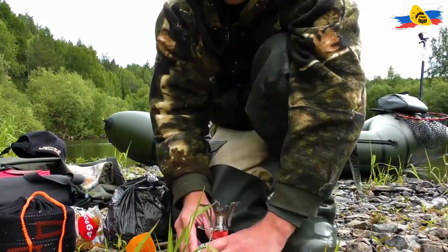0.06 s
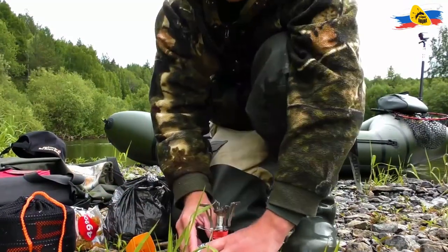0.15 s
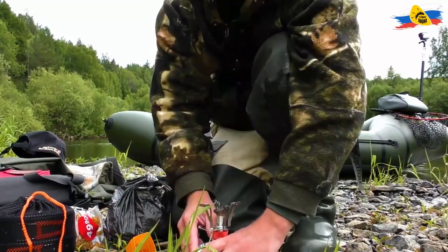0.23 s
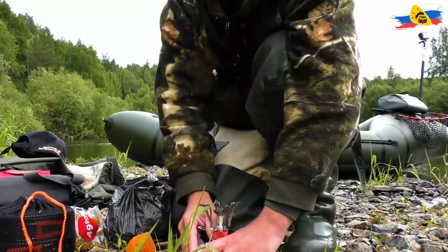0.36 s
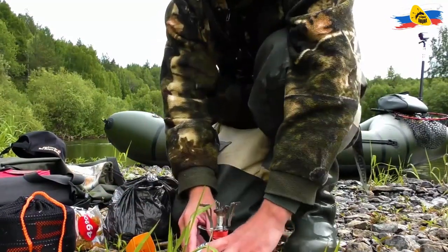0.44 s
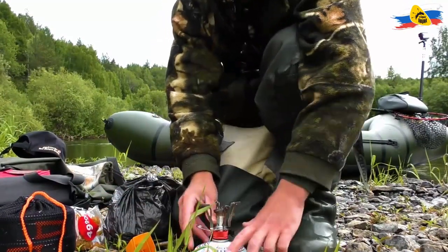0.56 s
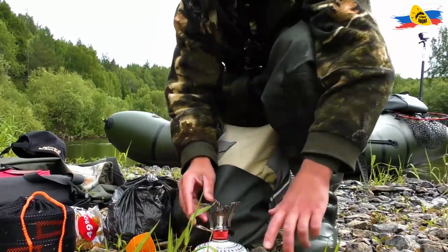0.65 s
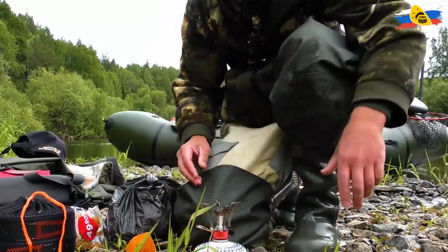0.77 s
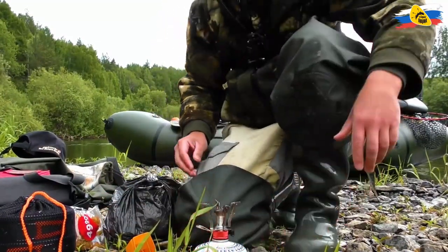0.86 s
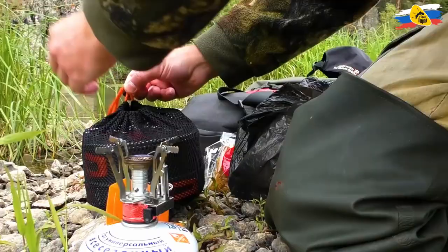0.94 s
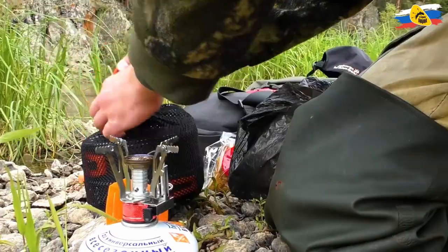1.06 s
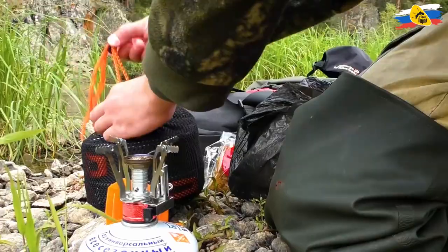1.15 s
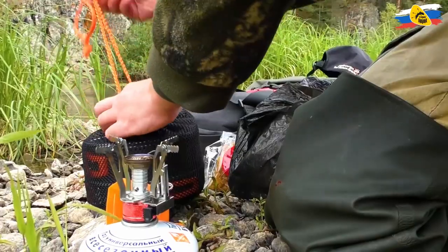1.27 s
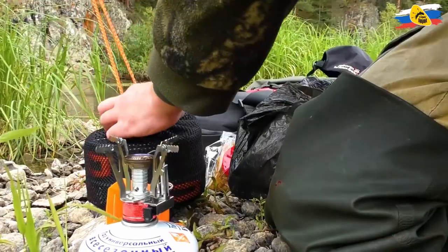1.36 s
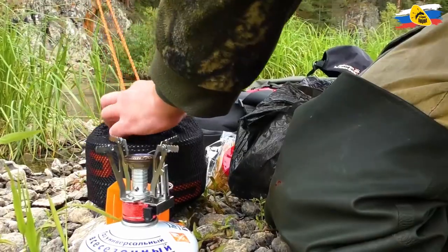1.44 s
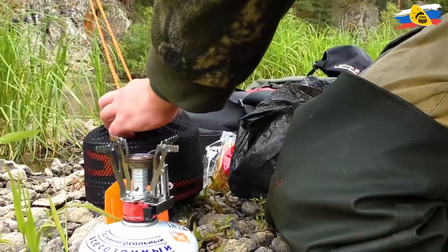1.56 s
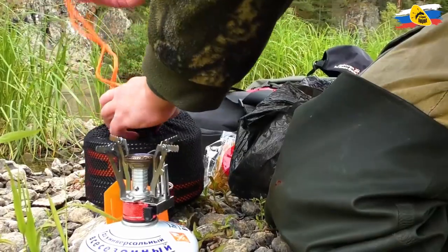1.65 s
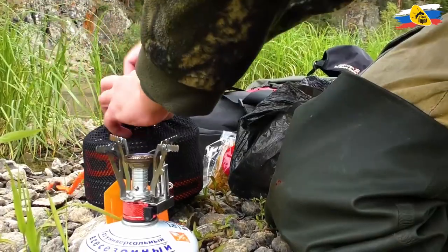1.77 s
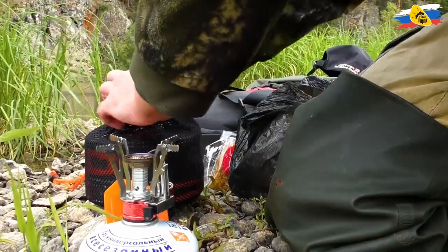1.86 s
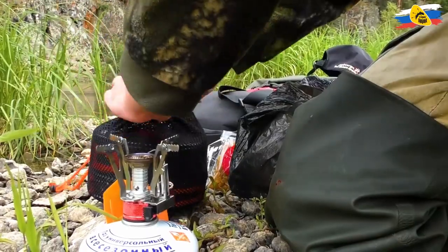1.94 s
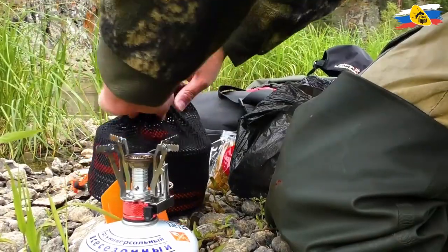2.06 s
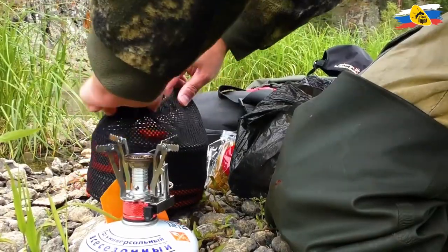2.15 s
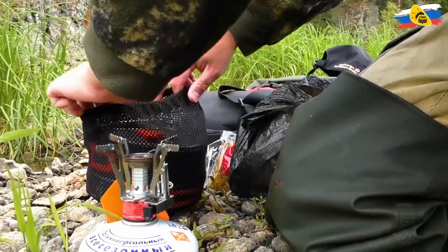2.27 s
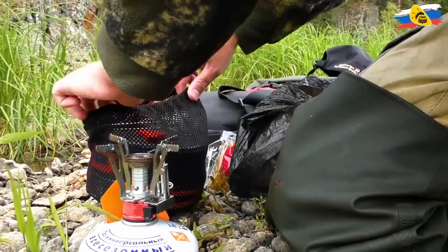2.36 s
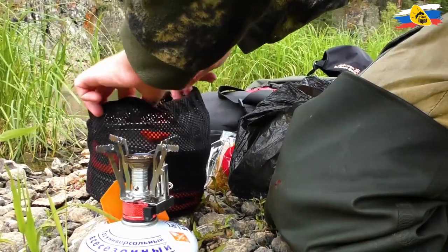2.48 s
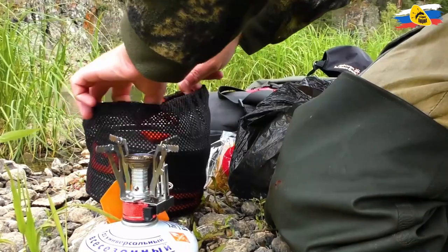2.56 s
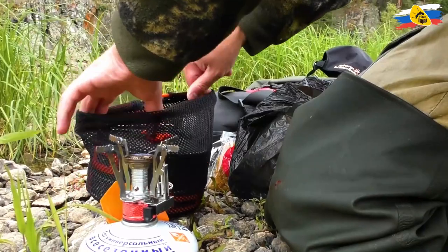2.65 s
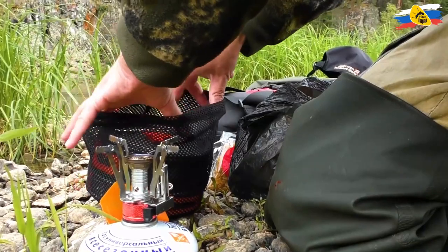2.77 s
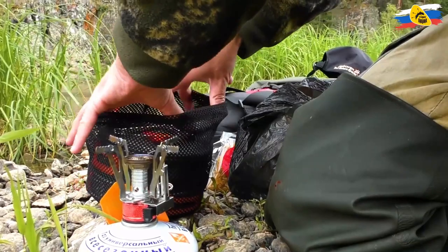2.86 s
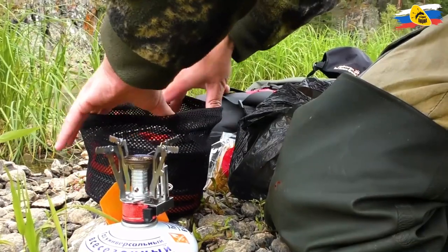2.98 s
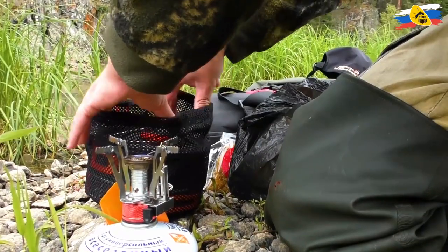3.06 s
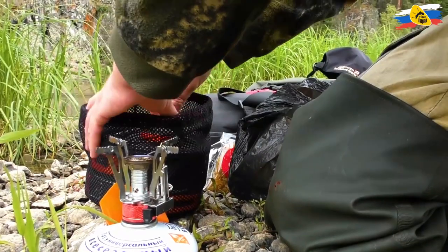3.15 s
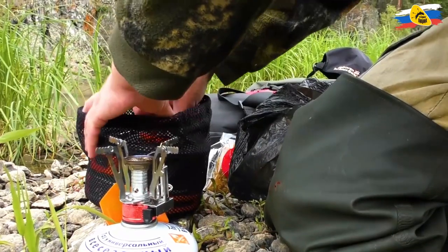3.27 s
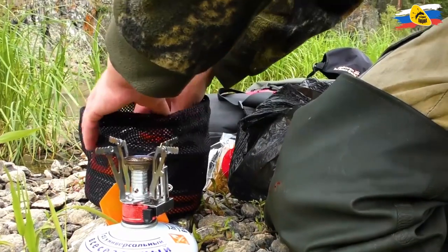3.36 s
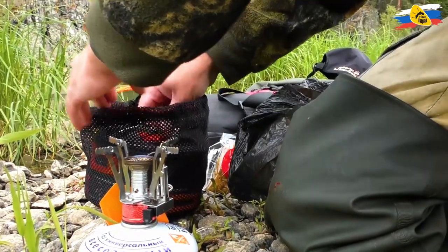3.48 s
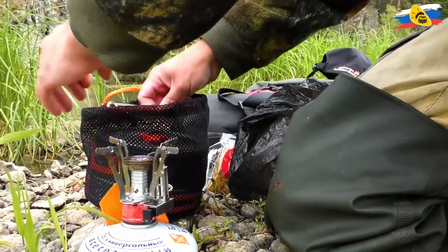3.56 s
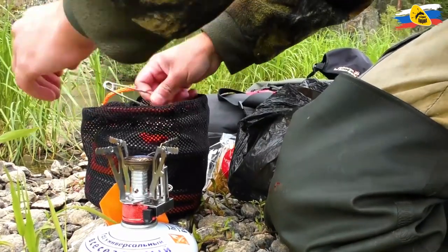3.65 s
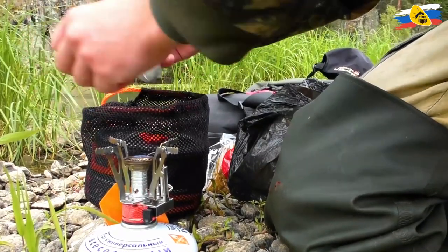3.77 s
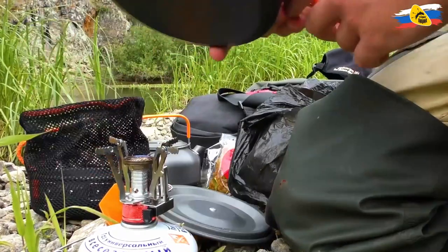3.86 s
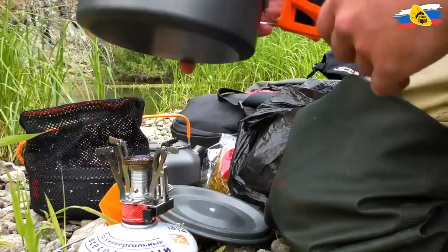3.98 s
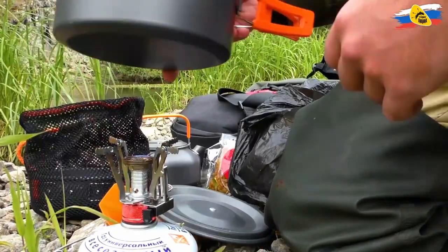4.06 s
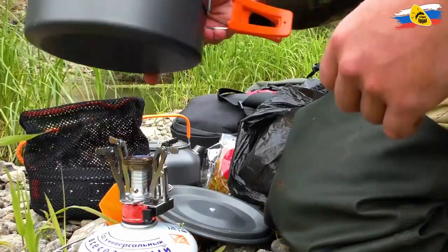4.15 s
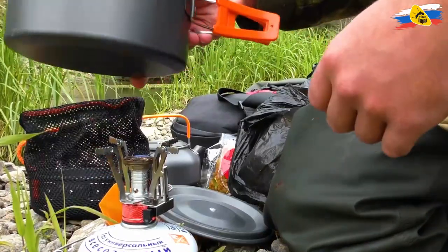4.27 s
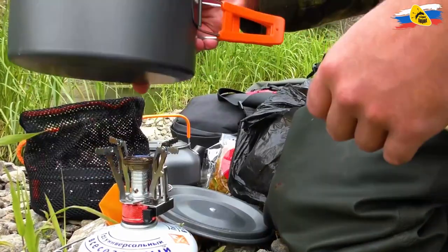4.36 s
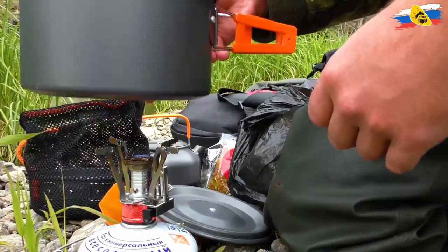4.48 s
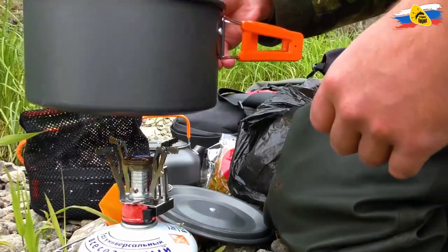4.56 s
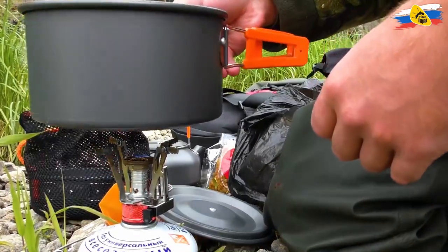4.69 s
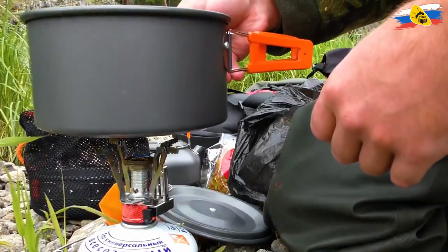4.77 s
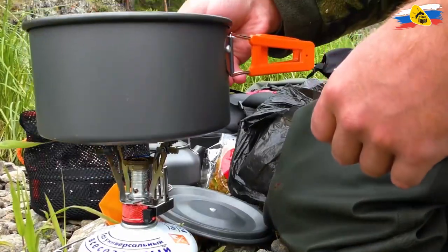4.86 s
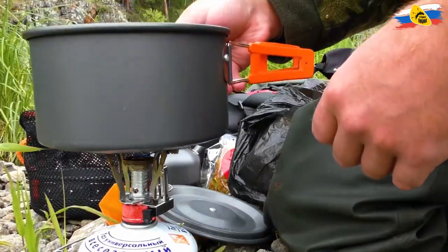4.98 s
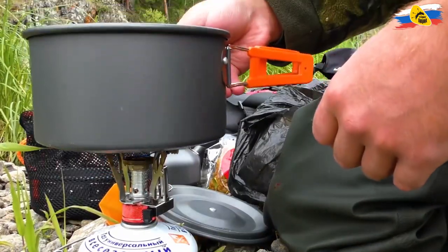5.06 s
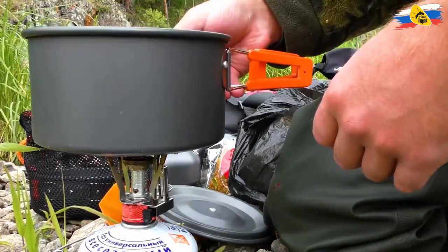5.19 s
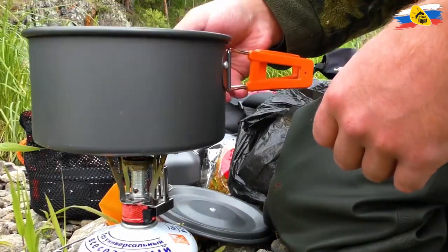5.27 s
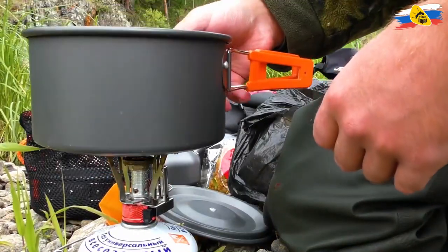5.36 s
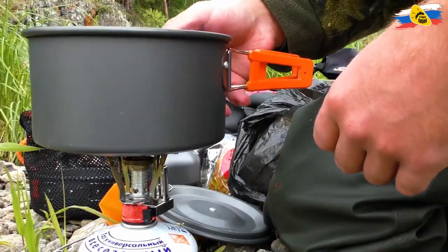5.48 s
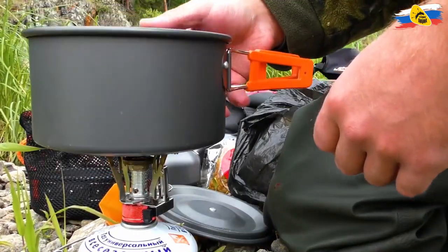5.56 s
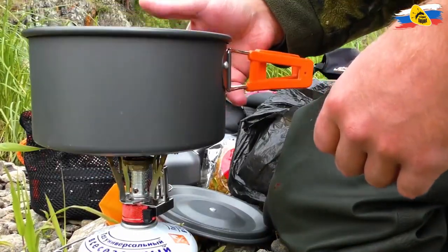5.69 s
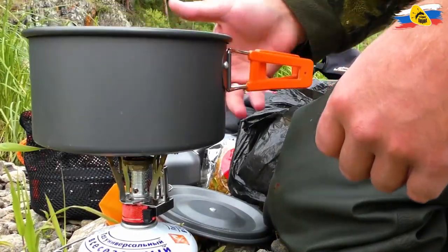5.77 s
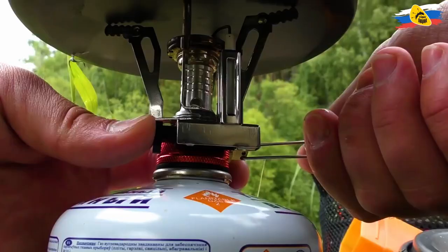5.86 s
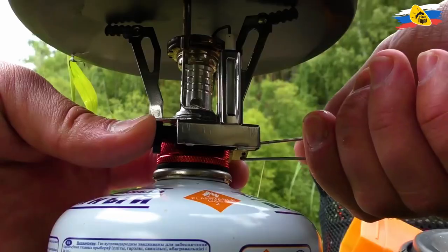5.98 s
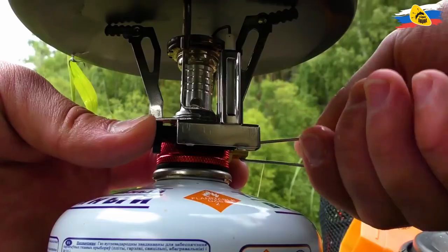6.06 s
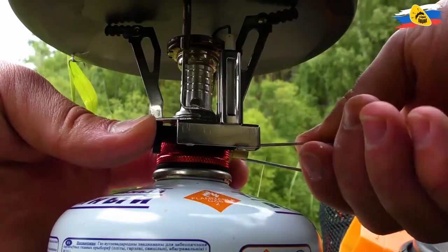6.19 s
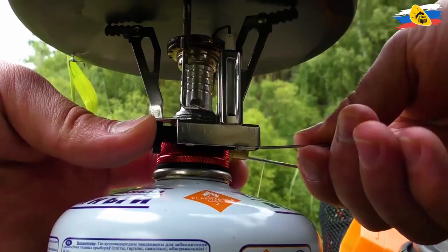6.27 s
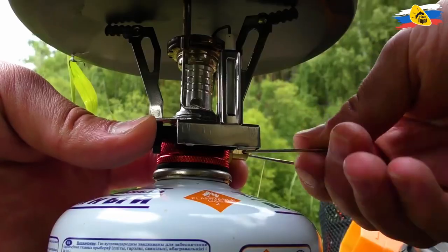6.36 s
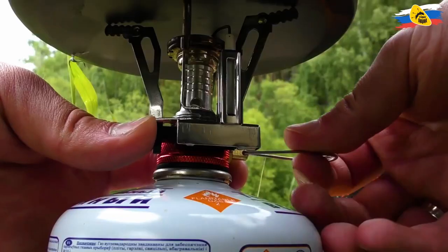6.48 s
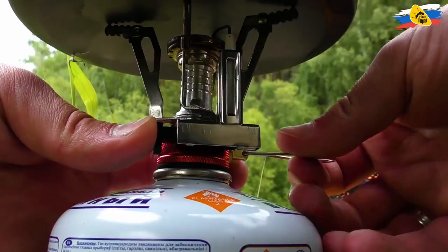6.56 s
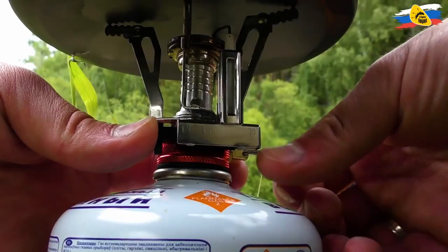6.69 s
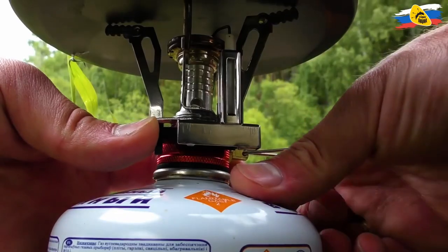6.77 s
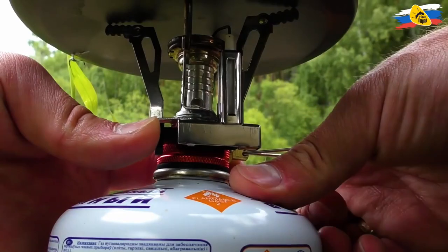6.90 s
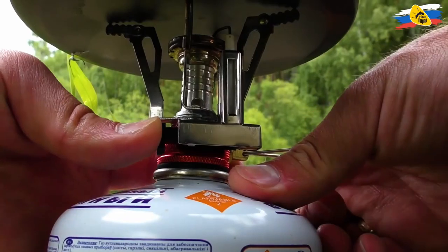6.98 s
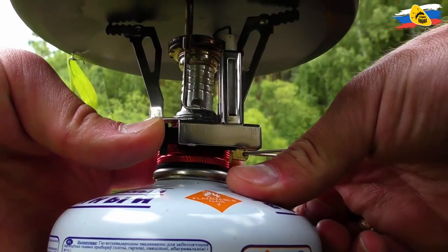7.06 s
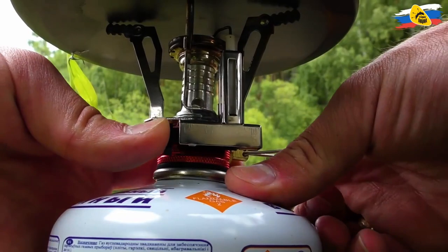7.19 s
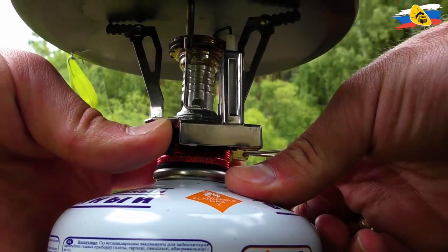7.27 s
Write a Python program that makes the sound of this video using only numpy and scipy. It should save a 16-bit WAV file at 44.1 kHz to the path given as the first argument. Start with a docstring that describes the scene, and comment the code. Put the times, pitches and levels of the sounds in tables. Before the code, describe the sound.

Nested metal cookpots knock, scrape and ring in a cloth bag outdoors with faint birdsong, then a camp stove valve opens into loud gas hiss.

```python
"""Nested pots knock, scrape and ring as hands open their mesh bag outdoors on gravel; cloth rustles, small birds call.
A pot is set on a folding stove, then the valve opens: gas hisses from the jet and low thuds come in pairs.
Knocks are rattles of contacts feeding decaying metal modes; slides are dense contacts through resonators.
Cloth and gas are coloured noise, birds are gliding tones, bumps and thuds are short dull pops with a gust."""
import sys
import numpy as np
from scipy import signal
from scipy.fft import rfft, irfft
from scipy.io import wavfile
from scipy.ndimage import uniform_filter1d

SR = 44100
rng = np.random.default_rng(int(sys.argv[2]) if len(sys.argv) > 2 else 0)


def natural_amplitude(level_db):
    """Convert a level in decibels to a linear amplitude factor, elementwise."""
    exponent = np.asarray(level_db, float) / 20
    return 10 ** exponent


def digitize_waveform(pressure):
    """Quantize a signal to 16-bit integers and store it at the path in sys.argv[1].

    Rows of a 2-D input are taken as channels; values are limited to [-1, 1].
    """
    field = np.atleast_2d(pressure).T
    bounded = np.clip(field, -1, 1)
    quanta = np.round(bounded * 32767).astype(np.int16)
    wavfile.write(sys.argv[1], SR, quanta)


N = 323253
T = np.arange(N) / SR

# modes of the nested pots: (frequency [Hz], level [dB], 60 dB decay [s])
NEST_MODES = [(456, -1, .09), (750, -12, 0.1), (972, 11, 0.043), (1250, 4, 0.051), (1725, 4, 0.077),
              (1994, 11, 0.036), (2460, 6.5, .035), (2936, 1.5, 0.11), (3800, 2, 0.048), (4250, 3, 0.053),
              (5090, -14, 0.082), (6450, -13, 0.086), (7620, -9.5, 0.068), (8080, -11.5, 0.066),
              (8530, -7.5, 0.1), (9050, -14, 0.091), (10870, -28.5, 0.068), (12440, -18.5, 0.062)]
# modes of the lone pot on the stove arms: (frequency [Hz], level [dB], 60 dB decay [s])
POT_MODES = [(343, -33, 1), (651, 0, 0.084), (872, 1.5, 0.037), (1080, -5.5, 0.088), (1470, 3, 0.16),
             (1650, -1, 0.07), (2160, -8, 0.14), (2300, -2.5, 0.089), (2700, -3, 0.085), (2890, -3, 0.078),
             (3280, -13, 0.067), (3520, -9, 0.11), (4360, -13, 0.095), (5230, -21, 0.22),
             (5950, -17, 0.077), (6440, -16, 0.066)]


def colour(x, points):
    """Shape by (frequency [Hz], level [dB]) points on a log axis, then scale to rms 1."""
    hz, db = np.transpose(points)
    f = np.maximum(np.arange(len(x) // 2 + 1) * SR / len(x), 1)
    gain = natural_amplitude(np.interp(np.log(f), np.log(hz), db))
    y = irfft(rfft(x) * gain, len(x))
    return y / np.sqrt(np.mean(y ** 2))


def curve(rows):
    """Columns of a time table, one value a sample."""
    s, *columns = np.transpose(rows)
    return [np.interp(T, s, c) for c in columns]


def walk(rate):
    """Random levels held 1 / rate s and slewed twice."""
    k = int(SR / rate)
    steps = np.repeat(rng.standard_normal(N // k + 1), k)
    return uniform_filter1d(uniform_filter1d(steps, k), k)[:N]


def grains(rate, spread_db, tail_ms):
    """Noise whose level jumps at random contacts (rate per second) and dies away after each."""
    hits = rng.random(N) < rate / SR
    jumps = hits * natural_amplitude(spread_db * np.minimum(rng.exponential(size=N), 4.5))
    power = signal.lfilter([1], [1, -np.exp(-1000 / (tail_ms * SR))], jumps ** 2)
    return rng.standard_normal(N) * np.sqrt(power + 1e-9)


def open_air():
    """A soft background of coloured noise whose level wanders slowly."""
    # outdoor spectrum: (frequency [Hz], level [dB])
    air_tone = [(12, -31.5), (20, -8.5), (86, -25.5), (177, -10), (210, -8), (1440, -17), (1570, -13),
                (2750, -10.5), (3340, -12), (4180, -18), (16000, -40.5)]
    return natural_amplitude(-54.5 + walk(3)) * colour(rng.standard_normal(N), air_tone)


def whistle(rows, rough):
    """A near sine along a pitch and level contour, with soft ends; rough is the relative pitch error."""
    hz, db = curve(rows)
    edge = np.clip(np.minimum(T - rows[0][0], rows[-1][0] - T) / 0.002, 0, 1)
    phase = 2 * np.pi * np.cumsum(hz * (1 + rough)) / SR
    return np.sqrt(2) * edge * natural_amplitude(db) * np.sin(phase)


def note(s, length, first_hz, held_hz, last_hz, db):
    """Contour of one bird note: steep slides at both soft ends, which lie 5 dB below the middle."""
    u = np.linspace(-1, 1, 13)
    slide = np.abs(u) ** 2.4
    end_hz = np.where(u < 0, first_hz, last_hz)
    hz = held_hz + (end_hz - held_hz) * slide
    return np.transpose([s + length * (u + 1) / 2, hz, db - 5 * slide])


def birds():
    """Small birds: each note slides into a held pitch and out of it, with a slight waver."""
    # notes: (time [s], length [s], first pitch [Hz], held pitch [Hz], last pitch [Hz], level [dB])
    bird_notes = [(-.03, .05, 4600, 4500, 5170, -48), (.1, .05, 4670, 4600, 5300, -45),
                  (.21, .056, 5070, 4470, 5300, -45.5), (.34, .064, 5200, 4360, 3460, -44),
                  (.472, .066, 5100, 4260, 3400, -43), (.632, .068, 3600, 3850, 4900, -46),
                  (.81, .05, 3930, 3800, 4140, -45), (4.155, .05, 4050, 3850, 4180, -48),
                  (4.295, .13, 3100, 3550, 3300, -55), (4.52, .135, 3170, 3520, 2950, -56),
                  (4.742, .06, 2150, 2980, 3180, -55), (4.848, .055, 2150, 2850, 3300, -55),
                  (4.955, .065, 2100, 3000, 3350, -55), (5.09, .055, 3650, 4150, 4400, -54),
                  (5.455, .06, 2900, 3220, 3800, -56), (5.613, 0.052, 4100, 3120, 3050, -57),
                  (5.655, 0.087, 3070, 3400, 2850, -58.5), (5.97, .14, 2920, 3450, 3700, -63)]
    waver = 0.0037 * walk(65)
    return sum(whistle(note(*row), waver) for row in bird_notes)


def strokes(rows, shape):
    """Power of body and treble: every stroke swells to its loudest moment and fades."""
    body, treble = 0, 0
    for s, swell_s, fade_s, db, treble_db in rows:
        # 20 dB lost over one swell or fade; the treble falls more steeply
        lost_db = 20 * np.where(T < s, (s - T) / swell_s, (T - s) / fade_s) ** shape
        body = body + natural_amplitude(db - lost_db) ** 2
        treble = treble + natural_amplitude(treble_db - 1.86 * lost_db) ** 2
    return body, treble


def scrape(modes):
    """Dense sliding contacts ring each mode; the moving contact point favours now one, now another."""
    contacts = grains(500, 3.2, 2.5)
    y = 0
    for hz, db, t60 in modes:
        width_hz = 1.5 * np.log(1000) / (np.pi * t60)
        favoured = contacts * natural_amplitude(6 * walk(30))
        mode = signal.lfilter(*signal.iirpeak(hz, hz / width_hz, SR), favoured)
        y = y + natural_amplitude(db) / np.sqrt(width_hz) * mode
    y = signal.sosfilt(signal.butter(2, 300, "high", fs=SR, output="sos"), y)
    return y / np.std(y)


def high_modes(modes):
    """The modes that carry the treble of a slide: evened out in level and shorter in decay."""
    return [(hz, .4 * db, .5 * t60) for hz, db, t60 in modes if hz > 3600]


def handling():
    """Cloth crackles low and swishes high; where pots slide, their walls ring."""
    # hands and knees shuffling among the gear: (time [s], level [dB], treble level [dB])
    shuffle = [(0, -44.5, -53), (.2, -48, -55.5), (.66, -41.5, -47), (1.0, -42, -50), (1.08, -45.5, -52.5),
               (1.75, -50.5, -54), (1.9, -47.5, -64), (3.72, -43.5, -50.5), (4.19, -43.5, -49.5),
               (4.46, -45, -55), (4.6, -48.5, -51), (4.87, -53.5, -63), (5.15, -52, -59),
               (5.48, -55.5, -68), (5.75, -56, -63.5), (5.92, -42.5, -50.5), (6.13, -49, -55),
               (6.2, -39, -53)]
    # sleeve and cord over cloth: (loudest time [s], swell [s], fade [s], level [dB], treble level [dB])
    sweeps = [(.08, 0.029, 0.056, -25, -30), (.91, 0.22, 0.15, -44.5, -32.5),
              (1.17, 0.049, 0.033, -27, -37), (1.285, .07, 0.03, -33, -42), (1.45, 0.41, 0.32, -39, -35.5),
              (1.63, 0.17, 0.14, -28.5, -46), (3.89, 0.11, 0.15, -29, -40.5),
              (3.98, 0.16, 0.16, -49, -33.5), (5.42, .025, .025, -52, -50)]
    # pots sliding on metal: (loudest time [s], swell [s], fade [s], level [dB], treble level [dB])
    scrapes = [(2.09, 0.084, 0.055, -22, -39.5), (2.165, 0.07, 0.058, -15, -22.5),
               (2.27, 0.073, 0.047, -25, -44), (2.33, .05, 0.037, -25.5, -50),
               (2.42, 0.057, .15, -25.5, -69), (2.6, 0.19, 0.13, -20.5, -59),
               (2.77, 0.081, 0.095, -32.5, -44), (2.85, 0.056, 0.078, -20, -57.5),
               (2.95, 0.057, 0.2, -30.5, -57), (3.11, 0.24, 0.16, -20, -30),
               (3.22, 0.16, 0.078, -19, -57.5), (3.465, 0.039, 0.076, -20.5, -44),
               (3.63, .12, 0.069, -32, -87), (5.185, 0.04, 0.13, -34, -56), (5.3, 0.07, 0.07, -31, -35),
               (5.37, 0.017, 0.14, -41, -64)]
    # spectrum of the low crackle: (frequency [Hz], level [dB])
    cloth_tone = [(35, -61), (60, -42), (286, -5.5), (490, -2.5), (721, 1.5), (841, 0.5), (926, -1.5),
                  (1120, 0.5), (6000, -18), (7800, -74.5), (13200, -120)]
    # spectrum of the high swish: (frequency [Hz], level [dB])
    swish_tone = [(1760, -16), (3000, 1), (4440, 0.5), (4860, -0.5), (5520, 0), (6260, -1), (8340, 3.5),
                  (10100, -11), (13200, -9), (16000, -13)]
    pot_lifted_s, metal_share = 3.8, 0.72  # the share of a slide's body power that is ringing metal

    db, treble_db = curve(shuffle)
    sweep, sweep_treble = strokes(sweeps, 1.74)
    slide, slide_treble = strokes(scrapes, 2.03)
    nested = T < pot_lifted_s
    cloth = colour(grains(500, 2.8, 7), cloth_tone)
    walls = np.where(nested, scrape(NEST_MODES), scrape(POT_MODES))
    swish = colour(grains(900, 2.47, 3.8), swish_tone)
    cloth_level = np.sqrt(natural_amplitude(db) ** 2 + sweep + (1 - metal_share) * slide)
    body = cloth_level * cloth + np.sqrt(metal_share * slide) * walls
    # the treble comes in clumps while the pots jostle, partly as their high modes
    clumps = slide_treble * natural_amplitude(2.6 * walk(50))
    shrill = np.where(nested, scrape(high_modes(NEST_MODES)), scrape(high_modes(POT_MODES)))
    swish_level = np.sqrt(natural_amplitude(treble_db) ** 2 + sweep_treble + 0.1 * clumps)
    treble = swish_level * swish + np.sqrt(.7 * clumps) * shrill
    hands_leave = np.clip((6.35 - T) / 0.035, 0, 1)
    return (natural_amplitude(2.0 * walk(34)) * body + treble) * hands_leave


def ring(modes, scatter_db, spread):
    """Impulse response, energy 1: each mode is a close trio, weighted and detuned anew for every blow."""
    hz, db, t60 = np.repeat(modes, 3, axis=0).T[:, :, None]
    chance = rng.standard_normal((2, len(hz), 1))
    t = T[:int(SR * min(t60.max(), .25))]
    # modes that die fast are broad, so their trios spread wider
    hz = hz + spread / t60 * chance[0]
    decay = np.exp(-np.log(1000) * t / t60)
    y = np.sum(natural_amplitude(db + scatter_db * chance[1]) * decay * np.sin(2 * np.pi * hz * t), axis=0)
    # thin walls radiate no bass
    y = signal.sosfilt(signal.butter(2, 300, "high", fs=SR, output="sos"), y)
    return y / np.sqrt(np.sum(y ** 2))


def knocks(rows, modes, spread, ring_db, soft):
    """Each blow is a short rattle of contacts: heard dry, and ringing in the metal."""
    body_band = signal.butter(2, [450, 3200], "band", fs=SR, output="sos")
    crack_band = signal.butter(2, [3500, 10500], "band", fs=SR, output="sos")
    out, t = np.zeros(N + SR), T[:SR // 4]
    for s, db, treble_db, decay_ms in rows:
        fall = np.log(1000) * 1000 * t / decay_ms
        # a softer contact is both duller and slower to build
        rise_ms = 0.61 + soft * max(-treble_db, 0)
        # uneven contacts: a few samples stand far above the rest
        uneven = natural_amplitude(2.62 * rng.standard_normal(len(t)))
        rattle = np.minimum(1000 * t / rise_ms, 1) * rng.standard_normal((2, len(t))) * uneven
        body = signal.sosfilt(body_band, 1.975 * rattle[0] * np.exp(-fall))
        # the crack on top dies faster than the body
        crack = signal.sosfilt(crack_band, 2.4 * rattle[1] * np.exp(-1.4 * fall))
        blow = body + natural_amplitude(treble_db) * crack
        # the metal feels its own balance: the crack's level in dB is scaled by 0.32
        felt = body + natural_amplitude(0.32 * treble_db) * crack
        rung = signal.fftconvolve(felt, ring(modes, 3, spread))[:len(t)]
        # the lighter the touch, the more of it is ring
        ring_gain = natural_amplitude(ring_db - 0.26 * db)
        start = int(s * SR)
        out[start:start + len(t)] += natural_amplitude(db - 11.0) * (blow + ring_gain * rung)
    return out[:N]


def canister_knocks():
    """The canister knocks on gravel: short contacts in a well damped shell."""
    # knocks: (time [s], relative level [dB], crack level [dB], 60 dB decay [ms])
    can_knocks = [(0.07, -14.5, -18, 30), (0.093, 3.5, -26, 15.4), (0.144, -11.5, -27, 17.4)]
    # canister modes: (frequency [Hz], level [dB], 60 dB decay [s])
    can_modes = [(520, 0, 0.024), (705, -4, 0.033), (1100, -3, 0.055), (1198, 5, 0.045), (2450, 0, 0.0095),
                 (3530, -4.5, 0.022)]
    return knocks(can_knocks, can_modes, spread=2.7, ring_db=4, soft=0.033)


def gear_knocks():
    """Dry knocks of stove, toggle and gravel: damped modes that hardly ring on."""
    # knocks: (time [s], relative level [dB], crack level [dB], 60 dB decay [ms])
    dry_knocks = [(0.815, -23, -8, 40), (1.055, -30, -13, 48), (1.156, -15, -3.5, 95),
                  (1.168, 9.5, -5.5, 57), (1.183, -5.5, -1.5, 72), (1.266, -15.5, -24, 81),
                  (1.307, -12.5, -14, 30), (1.385, -15, -16, 26), (1.435, -7.5, -36, 65),
                  (1.463, -4.5, -28, 76), (1.512, -3.5, -23, 53), (1.602, -4.5, -6.5, 48),
                  (1.612, -13, -33, 90), (1.649, -5, -13.5, 36), (1.703, -11, 4, 23), (1.89, -38, 7, 20),
                  (1.925, -5.5, 15.5, 19.6), (1.946, -4.5, -7.5, 17.6), (3.813, -28, -3, 21),
                  (4.035, -28, 12.5, 113), (4.057, -10, -27, 17), (4.27, -34, -13, 40),
                  (4.318, -21, -18, 18), (4.333, -18, -12, 21), (4.705, -29, -12.5, 20),
                  (5.826, -28, -23, 27), (5.881, -30.5, 13, 22), (5.914, -33, -10, 34)]
    # damped gear modes: (frequency [Hz], level [dB], 60 dB decay [s])
    gear_modes = [(444, -17, 0.045), (788, -11.5, .03), (1061, 2, 0.0336), (2016, 1, .03),
                  (2960, -0.5, 0.028), (4364, 1, 0.027), (5200, -3, 0.041), (6860, -12.5, 0.032)]
    return knocks(dry_knocks, gear_modes, spread=6.27, ring_db=-3.5, soft=0.28)


def dull_pops(rows, pitch_hz, rumble_db, follows, rumble):
    """Two or three cycles of a dull pop, with a short gust of rumble behind."""
    out, t = np.zeros(N + SR), T[:SR // 10]
    for s, db in rows:
        hz = pitch_hz * (1 + 0.044 * rng.standard_normal())
        pop = np.minimum(t * hz / 1.76, 1) * np.exp(-t * hz / 0.69) * np.sin(2 * np.pi * hz * t)
        overtone = np.minimum(t * hz / 1.8, 1) * np.exp(-t * hz / 1.0) * np.sin(2 * np.pi * 2.3 * hz * t)
        pop += 0.25 * overtone
        gust = colour(rng.standard_normal(len(t)), rumble) * t / 0.0061 * np.exp(1 - t / 0.0075)
        start = int(s * SR)
        # follows: how far the gust's level goes with the pop's
        out[start:start + len(t)] += natural_amplitude(db + 3.5) * pop + natural_amplitude(rumble_db + follows * db) * gust
    return out[:N]


def ground_bumps():
    """Dull bumps of heavy gear on the ground: low pops whose rumble grows with the blow."""
    # bumps: (time [s], relative level [dB])
    bumps = [(1.156, -16.5), (1.925, -34), (2.181, -22), (2.399, -1), (2.43, -12.5), (2.564, -5.5),
             (2.863, -10), (3.466, -5.5), (3.588, -8), (3.631, -12), (3.938, -36), (4.412, -25)]
    rumble = [(30, -57), (90, -21.5), (200, 15), (500, -6), (2000, -38.0)]
    return dull_pops(bumps, pitch_hz=269, rumble_db=-24.5, follows=0.99, rumble=rumble)


def low_hum():
    """A faint low hum: one unsteady tone along a drifting contour."""
    # contour: (time [s], pitch [Hz], level [dB])
    hum_contour = [(1.24, 130, -71), (1.33, 115, -59), (1.4, 122.6, -68), (1.46, 138, -57),
                   (1.52, 135, -74)]
    return whistle(hum_contour, 0.028 * walk(65))


def nest_knocks():
    """Nested pots knock together, and their shared modes ring."""
    # knocks: (time [s], relative level [dB], crack level [dB], 60 dB decay [ms])
    pot_knocks = [(2.005, -17, -2, 33), (2.024, -16, -45.5, 41), (2.11, 10, -10.5, 31.4),
                  (2.185, 2.5, 0.5, 76), (2.284, -24, 5, 65), (2.313, -24, -22, 140),
                  (2.353, -7.5, -48, 34), (2.397, -2.5, -12, 52), (2.431, 1, -9, 26.5), (2.5, -8, -35, 27),
                  (2.569, 9, -19, 33), (2.599, -8, -29, 64), (2.75, 6, -35, 26), (2.846, -6.5, -18, 39),
                  (2.861, -12, -10, 77), (2.923, -1.5, -13.5, 66), (2.957, -2, -2.5, 61),
                  (3.057, -7.5, -0.5, 48), (3.092, -15.5, 4.5, 160), (3.134, -5.5, -11, 110),
                  (3.206, -3, 2.5, 116), (3.254, -8.5, -38, 95), (3.303, -18, -32, 148),
                  (3.383, 0, -45, 17), (3.394, -13.5, -48, 124), (3.468, 14.5, -13.5, 32.6),
                  (3.588, 0, -20, 68), (3.631, 10, -14, 24.7)]
    return knocks(pot_knocks, NEST_MODES, spread=4.58, ring_db=-1, soft=0.05)


def held_pot():
    """The free rim of the pot held in the air sings its two modes after each touch."""
    # touches: (time [s], low mode level [dB], high mode level [dB])
    touches = [(3.955, -36.5, -70), (3.988, -46, -22), (4.045, -38, -20.5)]
    # rim modes: (frequency [Hz], 60 dB decay [s])
    rim_modes = [(393, 0.42), (1494, 0.15)]
    out = 0
    for s, *levels in touches:
        t = np.maximum(T - s, 0)
        for db, (hz, t60) in zip(levels, rim_modes):
            swell = np.minimum(t / 0.0055, 1) * np.exp(-np.log(1000) * t / t60)
            out = out + natural_amplitude(db) * swell * np.sin(2 * np.pi * hz * t)
    return out


def pot_taps():
    """The lone pot taps the stove arms as it meets them, and rings."""
    # taps: (time [s], relative level [dB], crack level [dB], 60 dB decay [ms])
    arm_taps = [(5.148, -2.5, -37, 28.4), (5.182, -16.5, -29, 53), (5.221, -24, -35, 107),
                (5.281, -3.5, -11, 17), (5.314, -10, -24, 28), (5.323, -12.5, -40, 38),
                (5.388, -40, -26, 24), (5.443, -44, -28, 28)]
    return knocks(arm_taps, POT_MODES, spread=2.65, ring_db=1.5, soft=0.024)


def low_hiss():
    """A steady dull hiss, mostly under 1.4 kHz, by the canister."""
    tone = [(150, -30), (400, -4), (1350, 0), (1600, -25), (4000, -50)]
    started = np.clip((T - 5.97) / .03, 0, 1)
    return natural_amplitude(-47.5) * started * colour(rng.standard_normal(N), tone)


def squeal():
    """A thin falling whistle as the hiss starts: a roughened sine."""
    # contour: (time [s], pitch [Hz], level [dB])
    squeal_contour = [(6.2, 6600, -48), (6.22, 5900, -43), (6.24, 4900, -44), (6.255, 4600, -50)]
    return whistle(squeal_contour, 0.0087 * walk(600))


def gas():
    """Turbulent jet; the mixing tube and the pot above it add narrow resonances."""
    # jet spectrum: (frequency [Hz], level [dB])
    jet_tone = [(150, -26), (250, -19.5), (651, -6.5), (1310, -6.5), (2130, -19.5), (2710, -16.5),
                (3170, -14.5), (3520, -12.5), (4820, -9.5), (5830, -2.5), (7060, -9.5), (9830, -8),
                (10500, -27), (12300, -10), (16000, -26.5)]
    # resonances: (frequency [Hz], width before widening [Hz], level [dB])
    jet_peaks = [(2650, 430, 2.5), (4520, 230, 3.5), (5130, 130, 2.5), (5880, 510, -0.5), (6580, 92, 5.5),
                 (7270, 59, 7), (7600, 83, 5), (8030, 120, -7), (8740, 64, 3), (10000, 400, -9),
                 (3640, 500, -1), (10970, 400, 8)]
    valve_s, opens_s = 6.211, 0.057  # midpoint and pace of the opening

    jet = colour(grains(4000, 0.54, 1.0), jet_tone)
    tube = 0
    for hz, width_hz, db in jet_peaks:
        peak = signal.iirpeak(hz, hz / (1.23 * width_hz), SR)
        tube = tube + natural_amplitude(db) * signal.lfilter(*peak, jet)
    hiss = 0.55 * jet + 0.79 * tube
    # dB still missing from the full flow
    short_db = -45.5 / (1 + np.exp((T - valve_s) / opens_s))
    dull = signal.sosfiltfilt(signal.butter(2, 9500, fs=SR, output="sos"), hiss)
    opened = np.clip((T - valve_s) / opens_s + 2, 0, 1)
    # the top octave arrives only as the flow nears full speed
    return opened * natural_amplitude(-20 + short_db) * (dull + natural_amplitude(.5 * short_db) * (hiss - dull))


def gas_thuds():
    """Low thuds under the hiss, mostly in pairs: dull pops, the quieter with the stronger gust."""
    # thuds: (time [s], relative level [dB])
    thud_times = [(6.269, -2), (6.433, -3), (6.463, -10), (6.553, -1), (6.579, -14), (6.672, -2),
                  (6.695, -2), (6.786, -2), (6.812, 0), (7.022, -12), (7.045, -9.5), (7.127, -1.5),
                  (7.165, -8), (7.224, -5.5), (7.254, -7), (7.315, -3)]
    rumble = [(20, -25), (150, -2.5), (400, -5.0), (1200, -17), (3000, -50)]
    return dull_pops(thud_times, pitch_hz=500, rumble_db=-39, follows=-0.28, rumble=rumble)


def scene():
    """All sources in the open air over a soft background."""
    background = open_air() + birds() + low_hum()
    gear = handling() + canister_knocks() + gear_knocks() + ground_bumps()
    pots = nest_knocks() + held_pot() + pot_taps()
    stove = low_hiss() + squeal() + gas() + gas_thuds()
    return (background + gear + pots + stove)[None]


def band_limit(x):
    """A steep low-pass at the top of the band."""
    return signal.sosfilt(signal.butter(12, 16460, fs=SR, output="sos"), x)


def record(dry):
    """The loudest knocks overload the input; the top is cut."""
    overloaded = np.clip(dry, -1.1, 1.1)
    top_cut = signal.ellip(8, .2, 60, 15900, fs=SR, output="sos")
    mix = np.clip(signal.sosfilt(top_cut, overloaded), -1, 1)
    return band_limit(mix)


dry = scene()
out = record(dry)
digitize_waveform(out)
```